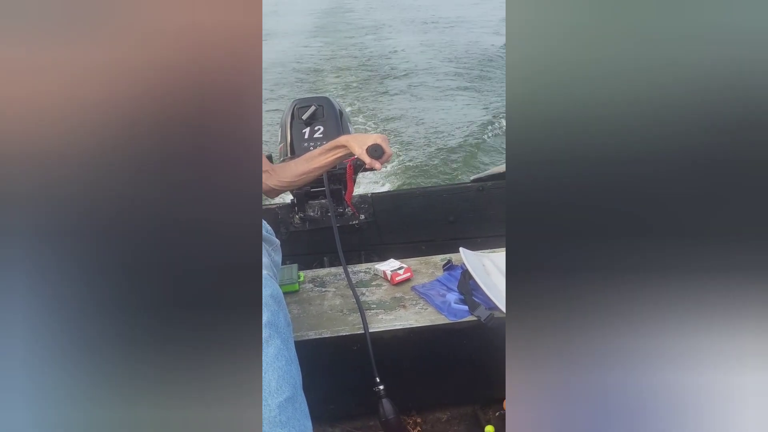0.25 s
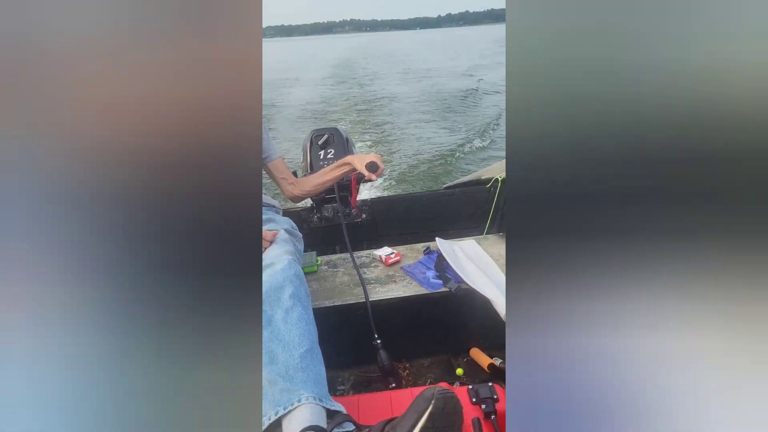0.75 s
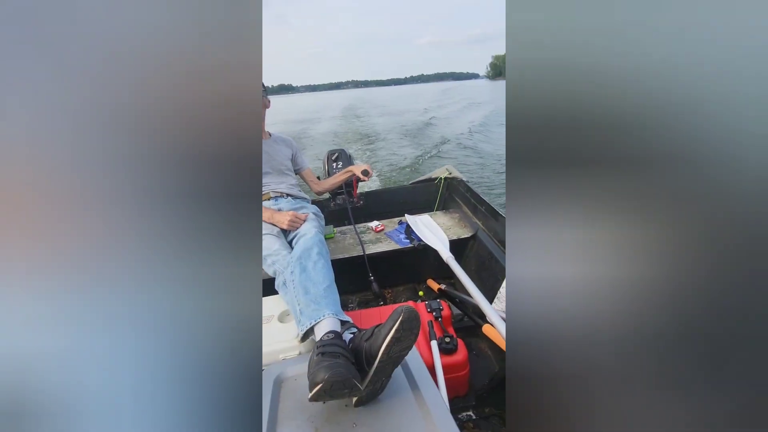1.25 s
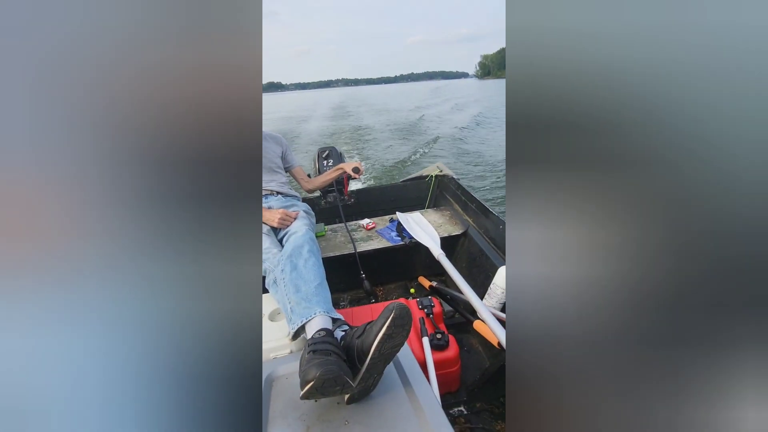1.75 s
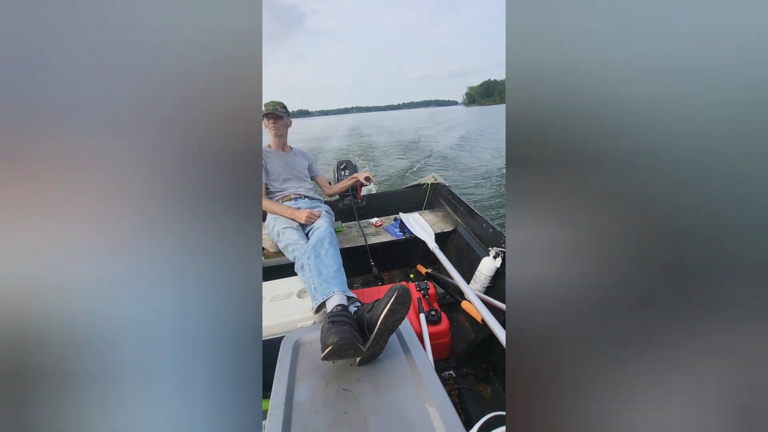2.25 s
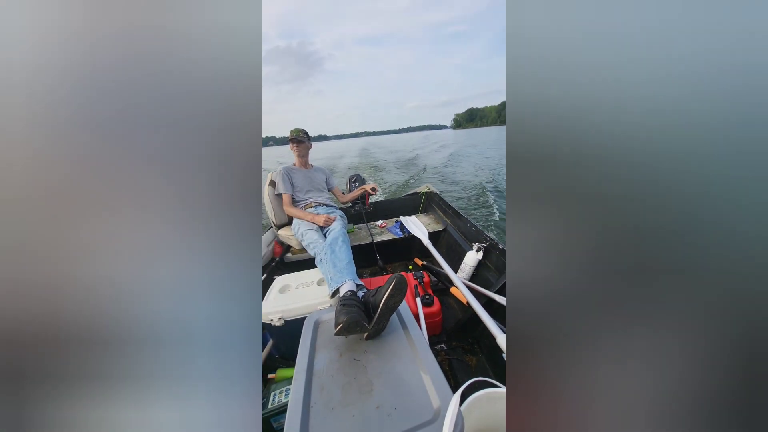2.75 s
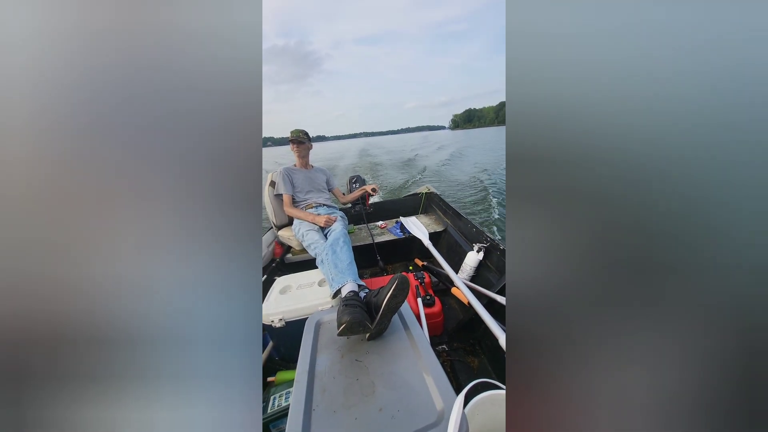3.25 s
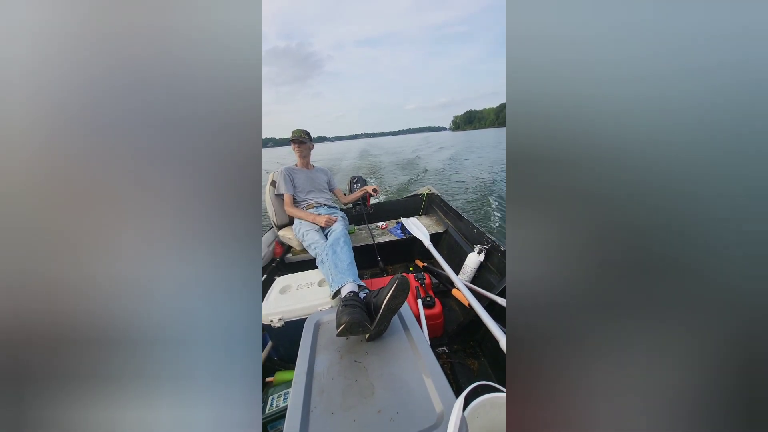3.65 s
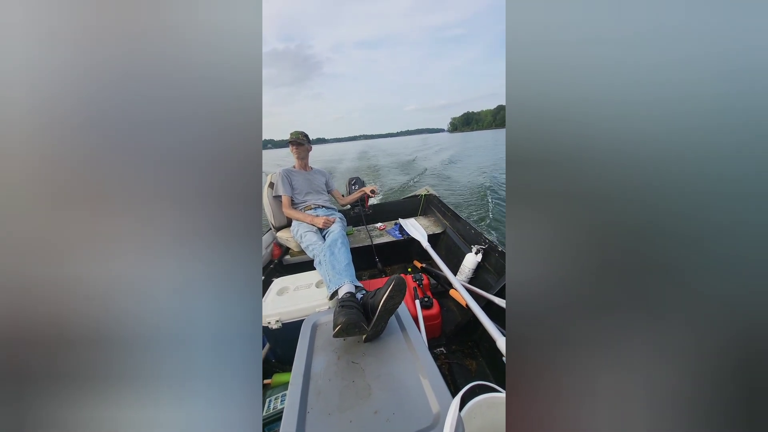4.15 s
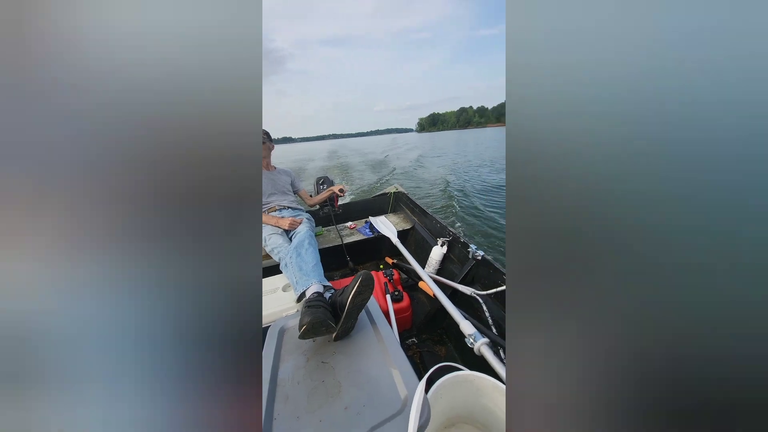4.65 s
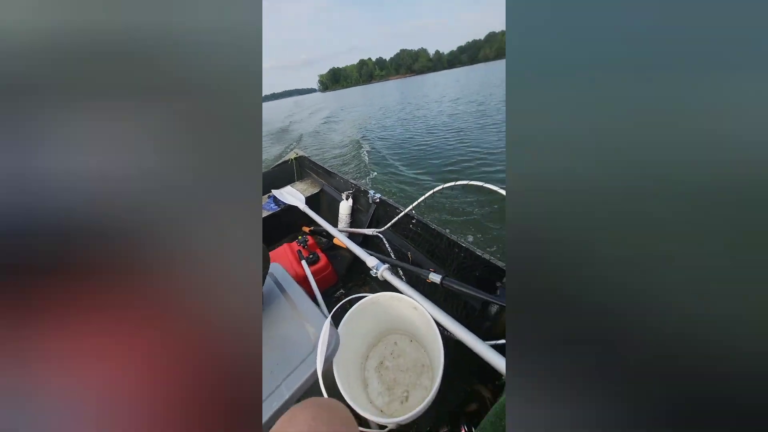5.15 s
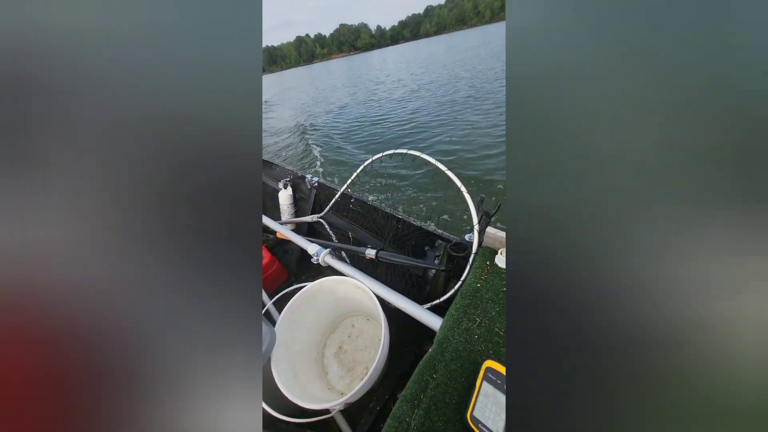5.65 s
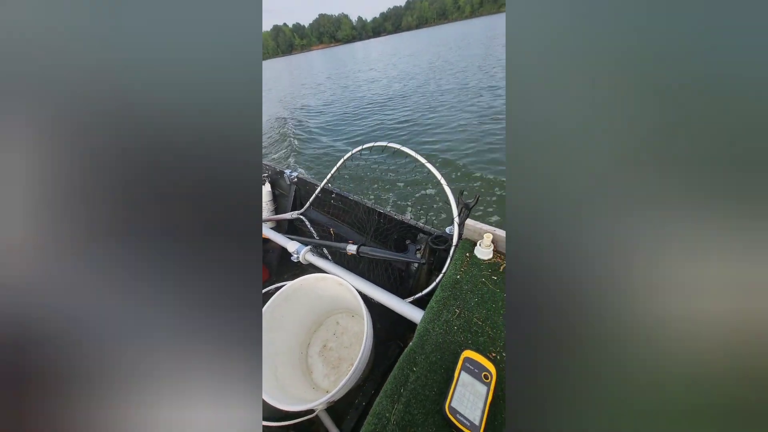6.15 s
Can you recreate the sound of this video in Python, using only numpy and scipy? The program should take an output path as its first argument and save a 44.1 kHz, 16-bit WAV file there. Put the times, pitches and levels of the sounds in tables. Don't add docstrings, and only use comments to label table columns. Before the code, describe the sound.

A small two-cylinder outboard pushes an open boat over a lake at steady throttle, heard a few metres away on a stereo phone. From 0 to about 0.7 s the level rises as the phone's gain opens. Then a constant low hum at roughly 100 firings per second holds, barely wavering, with buzzing overtones, turbulent exhaust roar, a ringing cowl and drumming hull. A loose part rattles about 50 times a second, blurring into a bright metallic chatter mixed with wake hiss, brighter on the right. The load swells slightly near 1 s. From 3.2 to 3.5 s fine fizzing drops appear on the right; at 4.1 s one firing is momentarily weak. From 4.9 s the phone swings away: the rattle eases, right-hand treble dulls, the left gets more edge, and the motor sags slightly around 5.6 to 5.9 s. At 6.37 s everything stops dead, without a tail.

```python
import sys
import numpy as np
from scipy import signal
from scipy.fft import rfft, irfft
from scipy.io import wavfile
from scipy.ndimage import uniform_filter1d

SR = 44100
rng = np.random.default_rng(int(sys.argv[2]) if len(sys.argv) > 2 else 0)


def magnitude_from_level(level_db):
    exponent = np.asarray(level_db, float) / 20
    return 10 ** exponent


def persist_wave(psi):
    counts = np.round(np.clip(psi, -1, 1) * 32767).astype(np.int16)
    wavfile.write(sys.argv[1], SR, np.atleast_2d(counts).T)


N = 282240

# time in seconds, firings per second (two to a crank turn).
FIRING_RATE = [(0.0, 100.11), (0.38, 100.5), (0.75, 101.49), (1.13, 100.67), (1.51, 100.96), (1.88, 101.56),
               (2.26, 100.93), (2.64, 100.68), (3.01, 100.9), (3.39, 101.2), (3.76, 100.67), (4.14, 101.08),
               (4.52, 101.09), (4.89, 100.9), (5.27, 100.49), (5.65, 101.44), (6.02, 100.92), (6.4, 100.61)]
START_TURN = 0.0617
GEAR_RATIO = 2.08
# time in seconds, level in dB.
LOAD = [(0, 0), (1.06, 0.84), (2.3, 0.1), (2.75, .5), (3.05, 0.7), (3.13, 0.8), (3.5, 0.4), (3.9, 0.14),
        (5.3, 0.5), (5.62, -1), (5.9, -1.2), (6.08, -0.5), (6.3, -0.6)]
HUM_DB, NOISE_FOLLOWS = -13.5, 0.88
WEAK_S, WEAK_WIDTH_S, WEAK_DEPTH = 4.1, 0.0061, 0.58

# multiple of the crank turn, level in dB.
CRANK_TONES = [(1, -15), (2, 0), (3, -25), (4, -24), (5, -28.5), (6, -24), (7, -39), (8, -21.5), (9, -29.5),
               (10, -24), (11, -47), (12, -27), (13, -21), (14, -27.5), (15, -51), (16, -26.5), (17, -70),
               (18, -39.5), (19, -66), (20, -67), (21, -52), (22, -45.5), (23, -39.5), (24, -42.5),
               (25, -36), (26, -37), (27, -40.5), (28, -49), (29, -40), (30, -48.5)]
# multiple of the crank turn, level in dB.
SHAFT_TONES = [(1.48, -40), (3.479, -45)]
BLOW_TURN, BLOW_RAD = 0.4, 3.4
SHADED_TONES_DB = -5

# frequency in Hz, level in dB per Hz.
ROAR = [(28, -82), (42, -53.5), (75, -50.5), (120, -53.5), (190, -55.5), (300, -62), (550, -62.5),
        (900, -67), (1100, -71.5), (1700, -74.5), (2600, -75.5), (4000, -95)]
# frequency in Hz, width in Hz, level in dB.
RINGS = [(658, 69, -40.5), (1280, 130, -43.5), (2022, 47, -49), (176, 40, -42.5)]
RING_WANDER_DB, RING_PER_S, RING_CALMS = -0.5, 5.24, 1
DRUM_WANDER_DB, DRUM_PER_S = 3, 16

# frequency in Hz, level in dB per Hz.
LEFT_SPRAY = [(1200, -73), (2400, -81), (3200, -77), (4500, -80.5), (5400, -84), (6200, -86.5),
              (7100, -89.5), (7600, -79), (8300, -90), (9000, -102), (12000, -118), (15600, -134)]
RIGHT_SPRAY = [(1200, -70), (2300, -68), (3200, -77.5), (3700, -70), (4200, -66.5), (5300, -68.5),
               (6000, -67.5), (6900, -67), (7900, -78), (9500, -82), (11400, -83.5), (13000, -71),
               (14000, -75), (15600, -77)]
# moment in turns, decay in turns, level in dB, brightness from 0 to 1.
KNOCKS = [
    (.59, .075, -.5, 1),
    (.68, .06, -2, .5),
    (.74, .04, -4, .1),
    (.81, .06, -5, .7),
    (.05, .07, -8, .1),
    (.4, .05, -10, .8),
]
# frequency in Hz, level in dB.
BRIGHT_BLOW = [(1500, -18), (4000, -1.0), (7000, 11.0), (10000, 7.5), (13000, 11.5)]
DULL_BLOW = [(1500, -9), (3000, 10.0), (5000, -0.5), (8000, 4), (13000, -1)]
# frequency in Hz, width in Hz, level in dB.
PANELS = [(2640, 19, 2), (3160, 50, 1.5), (4400, 39, -20), (5300, 71, 0.5), (5480, 29, -2.5),
          (7000, 15, -3.5), (8400, 42, -15), (10500, 60, -3), (12300, 56, -12), (13200, 49, -26)]
RATTLE_TURN = 0.6
RATTLE_DB, RATTLE_WANDER_DB, RATTLE_PER_S, RATTLE_SHADE_DB = -0.45, 2.2, 5.74, -4.5

# centre in Hz, width in Hz.
FIZZ_BAND = (11300, 12000)
LEAN_FROM_S, LEAN_TO_S, FIZZ_BEFORE_DB, FIZZ_DB = 3.2, 3.46, -72, -45
LEAN_HZ, LEAN_WIDTH_HZ, LEAN_SHARE = 2280, 3900, 0.24

# frequency in Hz, difference in dB.
PAN = [(50, 0.2), (100, 0.95), (150, -1.5), (400, -1), (520, -3), (620, 6), (700, 1), (810, 4), (1000, -2),
       (1300, -1), (2000, -4)]
# frequency in Hz, likeness from 0 to 1.
ALIKE = [(60, 0.73), (300, 0.99), (640, 0.36), (1400, 0.44), (3000, 0.1), (8000, 0.12)]
# time in seconds, share from 0 to 1.
SWING = [
    (0, 0.42),
    (0.6, 0.24),
    (4.86, 0.06),
    (5.0, 0.4),
    (5.1, 0.72),
    (5.6, 0.9),
    (6.4, 1),
]
# frequency in Hz, level in dB.
SWUNG_LEFT = [(100, 0), (300, 0.5), (540, 1), (605, 3.5), (710, 4.5), (810, 0), (1200, 0), (1400, 5),
              (2500, 1), (5400, 2.5), (7000, 8), (7700, -0.5), (9000, 2), (15000, 1)]
SWUNG_RIGHT = [(100, 0), (300, -1), (590, -0.5), (660, 9), (810, -3), (1200, -3), (1400, 3.5), (3000, 0),
               (5000, 1.5), (6000, -5), (7000, -12.5), (9500, -15), (13000, -15), (15500, -7)]
SETTLE_DB, SETTLE_FROM_S, SETTLE_TO_S = -6, 0.2, 0.67
STOP_S = 6.3702


def column(table, x, log=False):
    a, b = np.transpose(table)
    return np.interp(np.log(x + 1), np.log(a), b) if log else np.interp(x, a, b)


def swung():
    return np.clip(column(SWING, np.arange(N) / SR), 0, 1)


def ramp(from_s, to_s):
    done = np.clip((np.arange(N) / SR - from_s) / (to_s - from_s), 0, 1)
    return np.sin(np.pi / 2 * done) ** 2


def colour(x, gain):
    return irfft(rfft(x) * gain(np.fft.rfftfreq(N, 1 / SR)), N)


def tint(table):
    return lambda hz: magnitude_from_level(column(table, hz, log=True))


def per_hz(table):
    return lambda hz: tint(table)(hz) * np.sqrt(SR / 2)


def walk(rate):
    k = int(SR / rate)
    held = np.repeat(rng.standard_normal(N // k + 1), k)
    return 1.04 * uniform_filter1d(uniform_filter1d(held, k), k)[:N]


def flicker(x, lo_hz, db, rate):
    spec, hz, out = rfft(x), np.fft.rfftfreq(N, 1 / SR), 0
    place = 2 * np.log2(np.clip(hz, lo_hz, SR) / lo_hz)
    for k in range(int(place[-1]) + 2):
        share = np.cos(np.pi / 2 * np.clip(place - k, -1, 1)) ** 2
        out = out + magnitude_from_level(db * walk(rate)) * irfft(spec * share, N)
    return out


def pair():
    mid, side = rng.standard_normal((2, N))
    like = lambda hz: np.clip(column(ALIKE, hz, log=True), 0, 1)
    mid = colour(mid, lambda hz: np.sqrt((1 + like(hz)) / 2))
    side = colour(side, lambda hz: np.sqrt((1 - like(hz)) / 2))
    return np.array([mid + side, mid - side])


def fizz(turn):
    hz, width = FIZZ_BAND
    shake = 1 + 0.3 * np.cos(2 * np.pi * (turn - RATTLE_TURN - 0.08))
    grains = rng.standard_normal(N) * shake * magnitude_from_level(3.1 * walk(18))
    drops = colour(grains, lambda f: np.exp(-((f - hz) / width) ** 2 * 4))
    fizz_db = FIZZ_BEFORE_DB + (FIZZ_DB - FIZZ_BEFORE_DB) * ramp(LEAN_FROM_S, LEAN_TO_S)
    return magnitude_from_level(fizz_db) * drops / np.std(drops) * np.array([[0.1], [1]])


def rattle(turn, at, decay, spread_db):
    whole = np.floor(turn - at).astype(int)
    late, strength = rng.standard_normal((whole[-1] + 3, 2))[whole + 1].T
    since = turn - at - whole - 0.032 * np.abs(late)
    shape = (since > 0) * np.exp(-np.abs(since) / decay)
    return magnitude_from_level(spread_db * np.clip(strength, -2, 1.5)) * uniform_filter1d(shape, size=24)


def spray(turn, rattle_db):
    rattle_db = rattle_db + 2.6 * walk(13)
    bright, dull = 0, 0
    for at, decay, db, share in KNOCKS:
        blow = magnitude_from_level(db + rattle_db) * rattle(turn, at, decay, spread_db=1.4)
        bright = bright + share * blow
        dull = dull + (1 - share) * blow
    knocks = colour(pair() * bright, tint(BRIGHT_BLOW)) + colour(pair() * dull, tint(DULL_BLOW))
    grain = magnitude_from_level(0.7 * walk(40) + 1.2 * walk(11))
    hiss = flicker(pair() * grain, 1610, db=0.46, rate=12)
    freqs, metal = np.fft.rfftfreq(N, 1 / SR), 0
    for hz, width, db in PANELS:
        metal = metal + magnitude_from_level(db) / np.sqrt(1 + (2 * (freqs - hz) / width) ** 2)
    both = colour(0.66 * hiss + knocks, lambda hz: 1 + metal)
    return np.array([colour(both[0], per_hz(LEFT_SPRAY)), colour(both[1], per_hz(RIGHT_SPRAY))])


def roar(turn, ring_db, drum_db):
    rumble = colour(flicker(pair(), 70, db=1.5, rate=5.6), per_hz(ROAR))
    out = rumble * (1 + 0.11 * np.cos(4 * np.pi * (turn - 0.1)))
    for (hz, width, db), extra_db in zip(RINGS, (ring_db, 0, 0, drum_db)):
        swell = 1 + 0.35 * np.cos(2 * np.pi * (turn - BLOW_TURN))
        swell = swell * magnitude_from_level(0.8 * walk(12) + extra_db)
        level = magnitude_from_level(db) * np.sqrt(SR / np.pi / width)
        out += colour(pair() * swell, lambda f: level / np.sqrt(1 + (2 * (f - hz) / width) ** 4))
    pan = lambda sign: lambda hz: magnitude_from_level(sign * column(PAN, hz, log=True) / 2)
    return np.array([colour(out[0], pan(1)), colour(out[1], pan(-0.56))])


def tone_lag(k):
    if k <= 2:
        lag = 0
    elif k < 8 or k == 9:
        lag = (k - 3) ** 2 - 1 - 0.6 * (k == 4)
    else:
        lag = 2 * np.pi * k * BLOW_TURN - BLOW_RAD + 0.6 * ((k > 14) - (k == 14))
    return lag + 1.6 * (k == 12) * swung()


def hum(turn, hz, hum_db, ring_db, drum_db):
    t, away, out = np.arange(N) / SR, swung(), np.zeros((2, N))
    weak = 1 - WEAK_DEPTH * np.exp(-((t - WEAK_S) / WEAK_WIDTH_S) ** 2)
    for k, db in CRANK_TONES + SHAFT_TONES:
        rough = 0.05 if k == 2 else 0.09 if k <= 16 else 0.4
        waver = 1 + rough * (walk(24.005) + 1j * walk(24))
        slip = 0
        if k % 1 > 0 or k > 16:
            slip = 0.9 * walk(1.19) + 2 * np.pi * rng.random()
        if k == 13 or 24 <= k <= 26:
            shaft = 2 * np.pi * turn / GEAR_RATIO + 0.3 * walk(1.5)
            slip = slip + (0.8 - 0.3 * away) * np.sin(shaft)
            waver = waver * (1 - 0.27 * away * np.cos(shaft))
        in_cowl = np.exp(-((k * hz - RINGS[0][0]) / 70) ** 2)
        level_db = db + hum_db + in_cowl * ring_db + (k == 4) * drum_db
        level_db = level_db + (k in (9, 16)) * SHADED_TONES_DB * away
        size = magnitude_from_level(level_db) * (weak if k <= 2 else 1)
        phase = 2 * np.pi * k * turn + slip - tone_lag(k)
        wave = np.sqrt(2) * size * waver * np.exp(1j * phase)
        pan_db = column(PAN, k * hz, log=True)
        skew = 0.13 + 0.46 * walk(3.03) * min(k / 8, 1)
        left = wave * magnitude_from_level(pan_db / 2) * np.exp(-0.5j * skew)
        right = wave * magnitude_from_level(-pan_db / 2) * np.exp(0.5j * skew)
        out += np.real([left, right])
    return out


def lean(x):
    middle = colour(x[1], lambda f: np.exp(-((f - LEAN_HZ) / LEAN_WIDTH_HZ) ** 2))
    share = LEAN_SHARE * ramp(LEAN_FROM_S, LEAN_TO_S)
    return np.array([x[0], x[1] - share * middle])


def swing(x):
    shaded = np.array([colour(x[0], tint(SWUNG_LEFT)), colour(x[1], tint(SWUNG_RIGHT))])
    return x + swung() * (shaded - x)


def scene():
    away, load_db = swung(), column(LOAD, np.arange(N) / SR)
    turn_hz = column(FIRING_RATE, np.arange(N) / SR) / 2
    turn = START_TURN + np.cumsum(turn_hz) / SR
    ring_db = RING_WANDER_DB * walk(RING_PER_S) * (1 - RING_CALMS * away)
    drum_db = DRUM_WANDER_DB * walk(DRUM_PER_S)
    rattle_db = RATTLE_DB + RATTLE_WANDER_DB * walk(RATTLE_PER_S) + RATTLE_SHADE_DB * away
    noise = fizz(turn) + lean(spray(turn, rattle_db)) + roar(turn, ring_db, drum_db)
    tones = hum(turn, np.mean(turn_hz), HUM_DB + load_db, ring_db, drum_db)
    gain_db = SETTLE_DB * (1 - ramp(SETTLE_FROM_S, SETTLE_TO_S))
    return magnitude_from_level(gain_db) * swing(tones + magnitude_from_level(NOISE_FOLLOWS * load_db) * noise)


def low_pass(x):
    return signal.sosfilt(signal.butter(12, 15750, fs=SR, output="sos"), x)


def record(dry):
    stopped = dry * (np.arange(N) < STOP_S * SR)
    mix = colour(stopped, lambda hz: hz < 15800)
    return low_pass(mix)


dry = scene()
out = record(dry)
persist_wave(out)
```